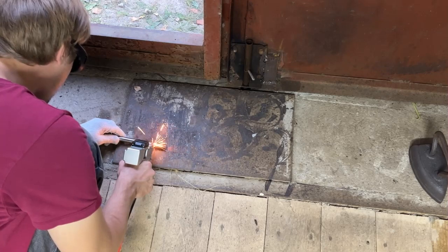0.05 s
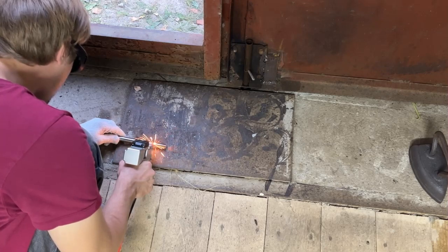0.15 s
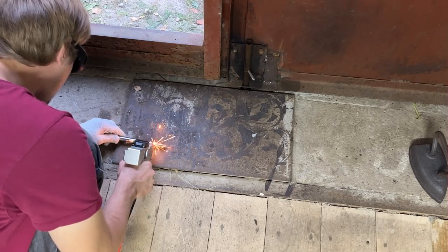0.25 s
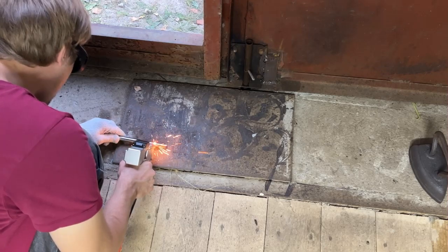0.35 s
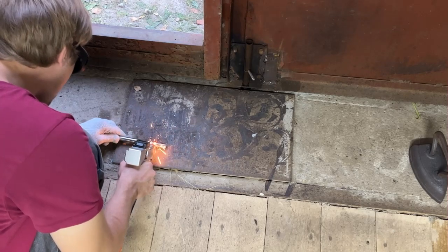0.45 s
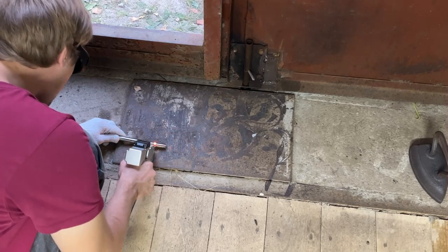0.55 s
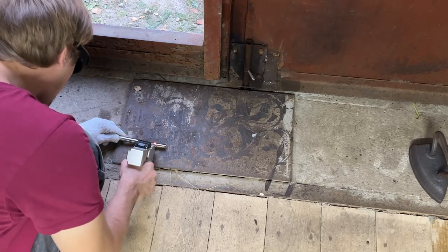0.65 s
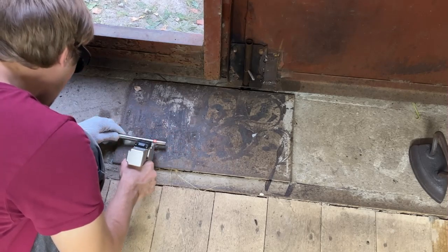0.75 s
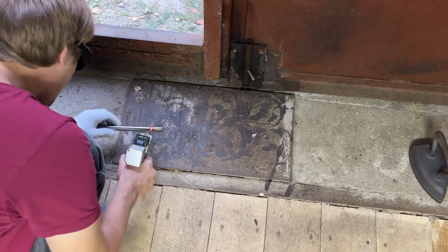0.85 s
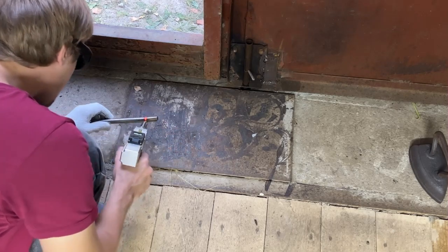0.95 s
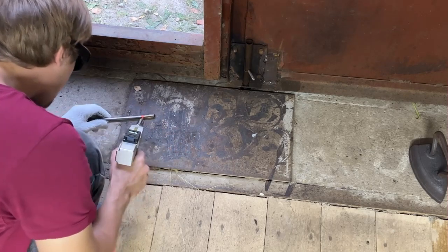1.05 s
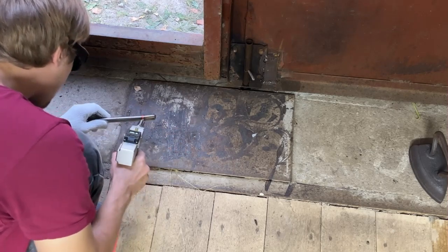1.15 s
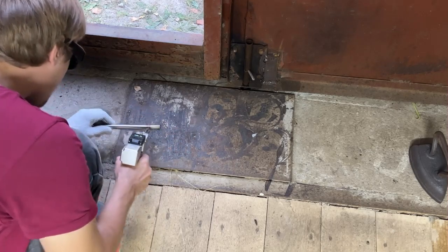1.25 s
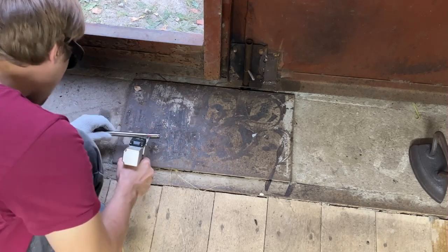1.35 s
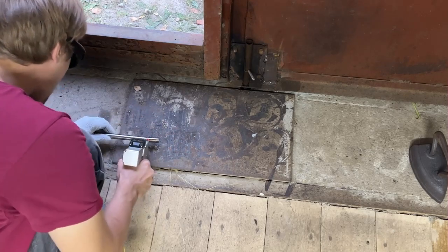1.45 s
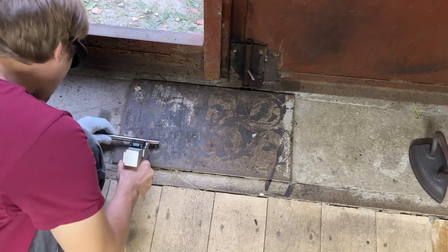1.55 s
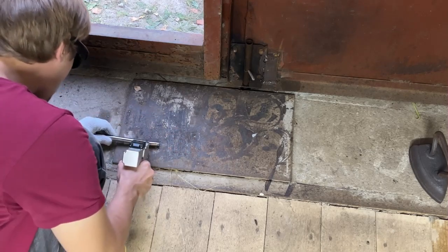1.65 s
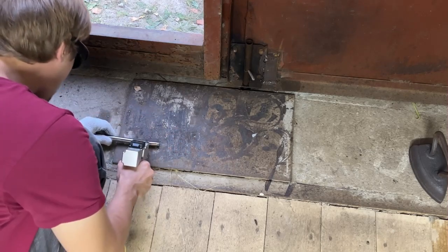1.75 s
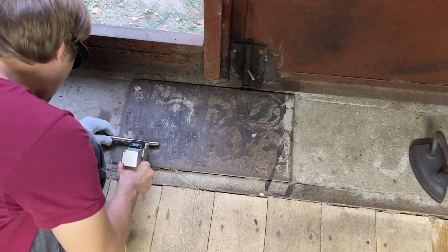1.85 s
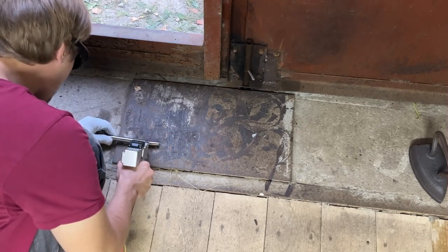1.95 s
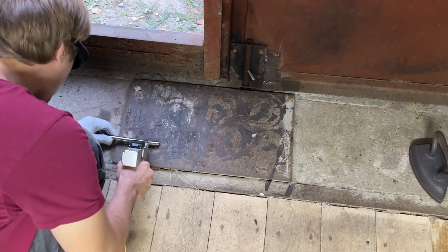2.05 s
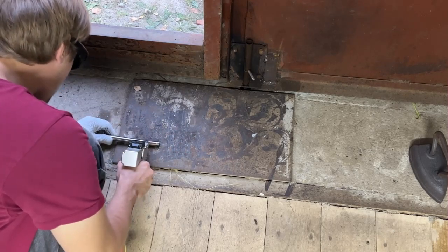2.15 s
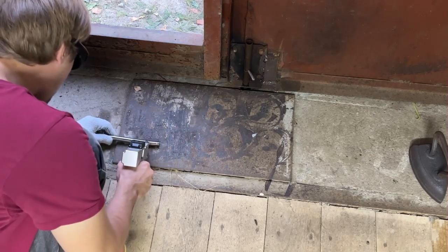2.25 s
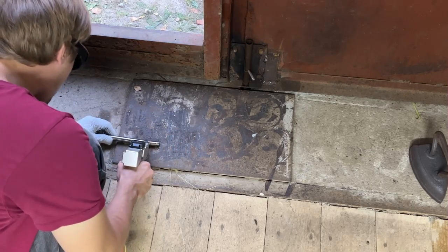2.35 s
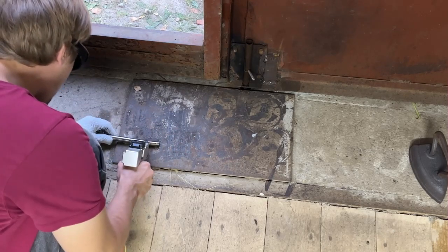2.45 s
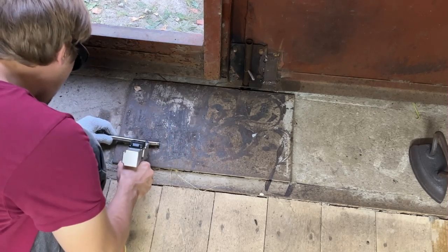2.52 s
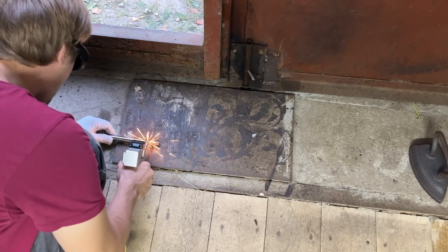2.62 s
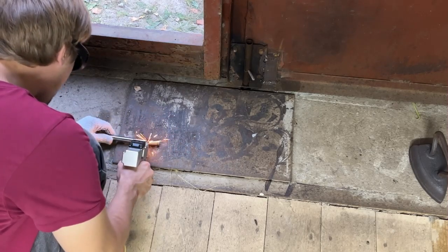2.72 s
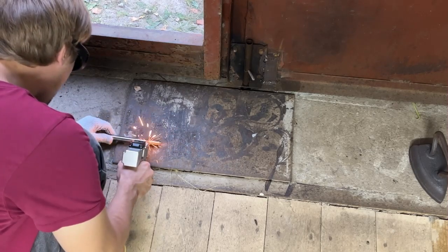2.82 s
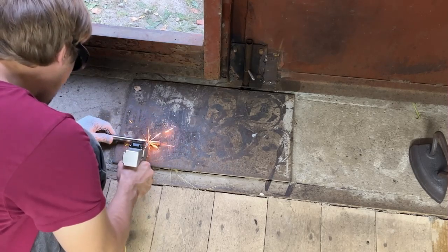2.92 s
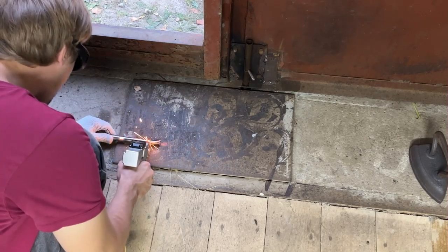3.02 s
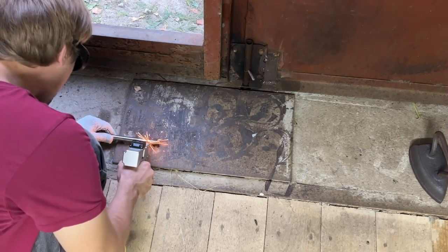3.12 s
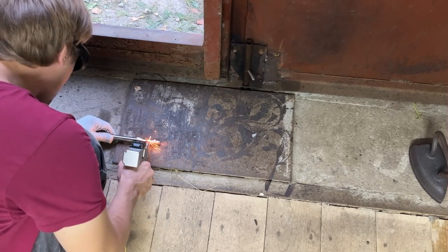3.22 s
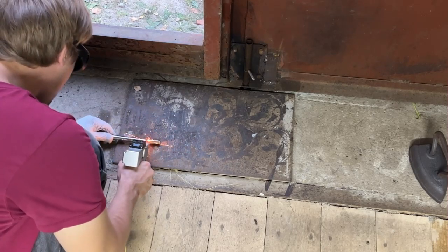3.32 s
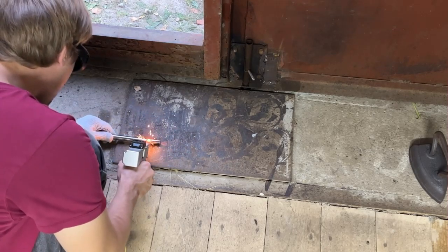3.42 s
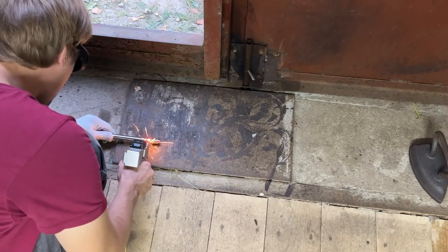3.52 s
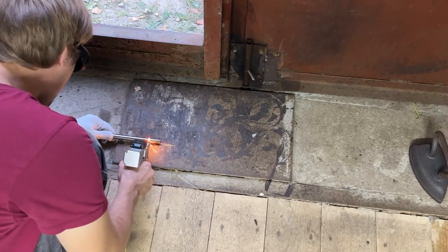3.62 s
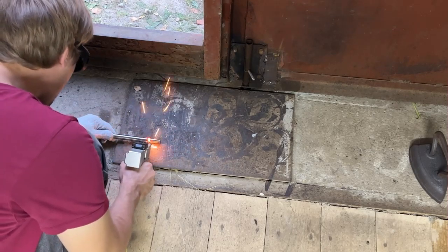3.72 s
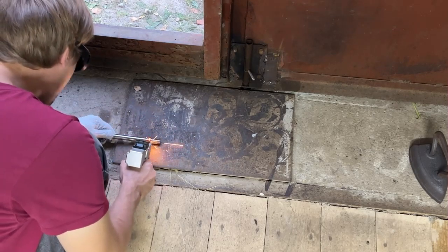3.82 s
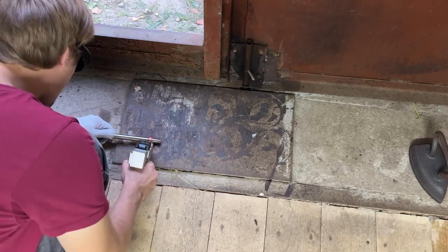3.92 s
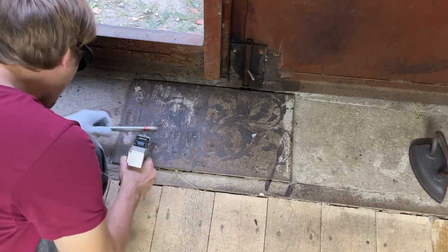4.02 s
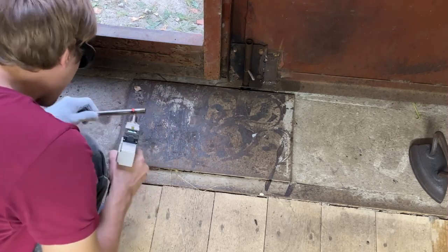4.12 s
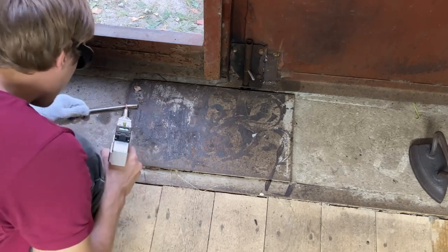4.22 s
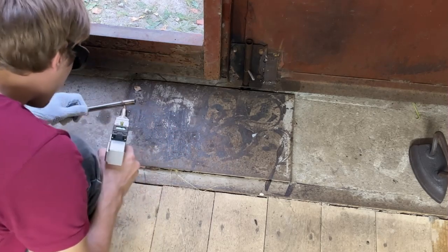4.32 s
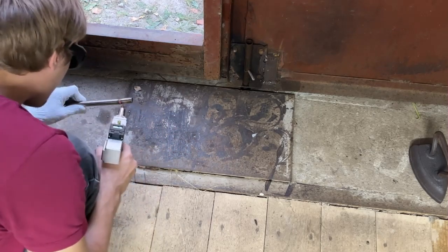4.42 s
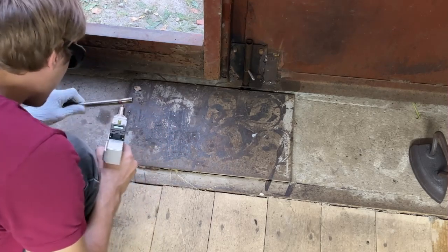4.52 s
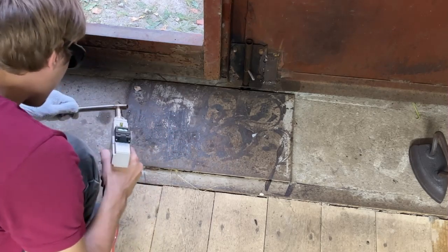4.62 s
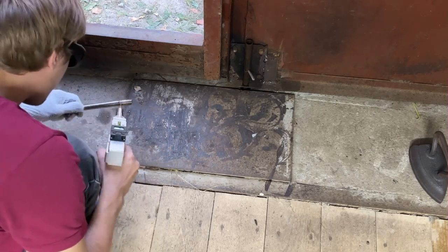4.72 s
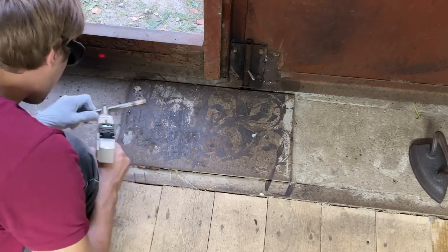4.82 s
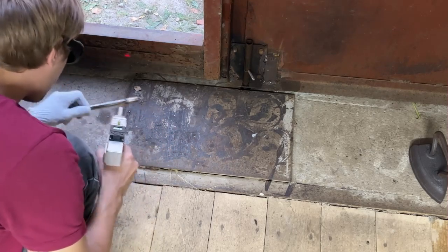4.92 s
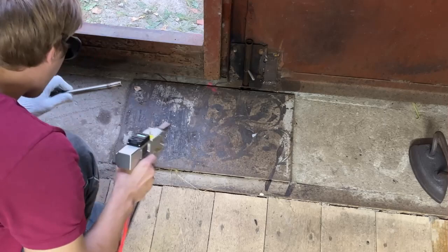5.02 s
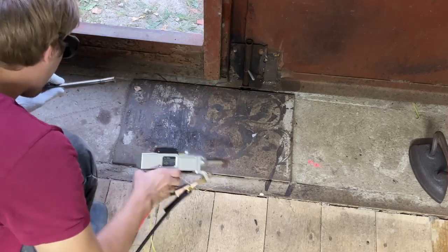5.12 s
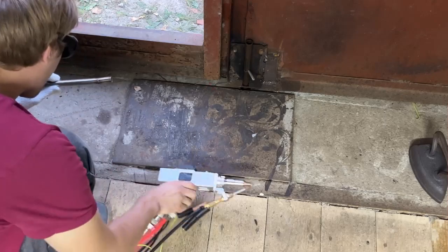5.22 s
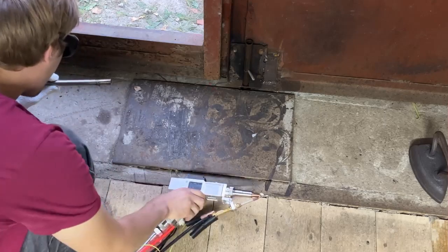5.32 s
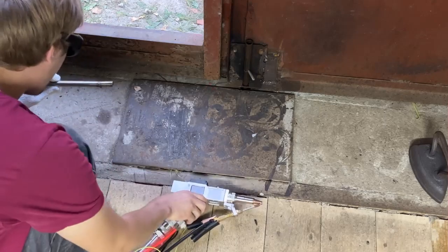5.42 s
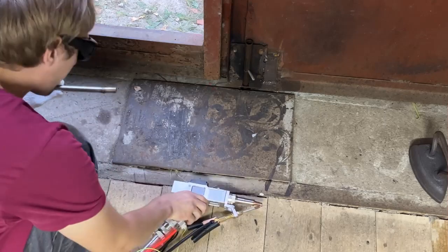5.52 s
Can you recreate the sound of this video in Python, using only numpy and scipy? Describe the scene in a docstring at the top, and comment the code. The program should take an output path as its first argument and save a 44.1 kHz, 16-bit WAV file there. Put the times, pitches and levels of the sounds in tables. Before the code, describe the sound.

A machine's fan hiss and low, wavering hum run throughout in a workshop. From the start, a handheld laser welder sizzles on steel, high and crackling, until about 0.5 seconds. Its shielding gas hisses with a thin, hoarse whistle and fades near 0.9 seconds. At 2 seconds the gas spits and puffs briefly, then spits again at 2.3 and keeps hissing. A second, longer weld sizzles and spatters unevenly from 2.6 to 3.9 seconds, and the gas dies away just after 4.2. After each weld, the wire feeder's motor gives two faint, short blips. At about 4.7 seconds the fan noise steps up a little, and at 4.8 the wire tip flicks off the steel with a small, bright ring. Hoses then bump softly and dully on floorboards around 4.9, 5.3 and 5.4 seconds.

```python
"""Workshop floor, by a door: a handheld laser welder runs two short seams on stainless steel.
Under the beam, vapour pops in the melt pool merge into a sizzle. Shielding gas spits as its valve opens,
hisses and rings the nozzle. The wire feeder's stepper jogs twice after each seam.
A machine drones and hisses behind; its fan noise steps up near the end,
where the wire tip flicks off the steel and the hoses bump the boards."""
import sys
import numpy as np
from scipy import signal
from scipy.fft import rfft, irfft
from scipy.io import wavfile
from scipy.ndimage import map_coordinates

SR = 44100
rng = np.random.default_rng(int(sys.argv[2]) if len(sys.argv) > 2 else 0)


def int16_out(signal):
    """Quantize to a 16-bit WAV file."""
    q = np.round(np.clip(np.atleast_2d(signal).T, -1, 1) * 32767)
    wavfile.write(sys.argv[1], SR, q.astype(np.int16))


N = 245195
TIME_S = np.arange(N) / SR
FREQS_HZ = np.arange(N // 2 + 1) * SR / N

# beam on: start_s, end_s
SEAMS = [(0, .49), (2.59, 3.868)]
# melt pool boil per seam: time_s, sizzle_gain_db, brightness (0-1), spatter_gain_db
FIRST_BOIL = [(0.0, -18.5, 0.63, 2), (0.254, -19.5, 0.7, 4.5), (0.372, -19.5, 0.6, 0.5),
              (0.485, -21.5, 0.28, 4.5)]
SECOND_BOIL = [(2.595, -22, 0.75, 5.5), (2.675, -21, 0.82, 4), (2.72, -23, 0.88, -4), (2.8, -20.5, 1, -1.5),
               (2.9, -23, 0.54, 1.5), (3.163, -23, 0.51, -4), (3.19, -19.5, 1, 2), (3.27, -19.5, 0.94, 3),
               (3.369, -24.5, 0.75, 0), (3.613, -20, 0.8, 3), (3.683, -23.5, 0.76, -9),
               (3.705, -33.5, .6, 4.5), (3.735, -26, 0.55, 5), (3.77, -29, 0.66, 1),
               (3.805, -22, 0.58, 3.5), (3.865, -25, 0.31, 7.5)]
# sizzle peaks and dips per seam: freq_hz, width_hz, gain_db
FIRST_PEAKS = [(9050, 300, -3), (9750, 300, 2), (11360, 200, 5), (11600, 200, -2), (12100, 250, 3),
               (12650, 350, -3), (13300, 500, 2.5), (14000, 250, -4), (14600, 600, 5)]
SECOND_PEAKS = [(8350, 500, 3), (9500, 1200, 1.5), (10650, 220, 4), (11500, 400, 2), (12250, 180, 5.5),
                (12650, 300, -5), (13800, 400, 2), (14200, 300, -3), (15150, 400, -2), (15520, 200, 3)]
# melt pool spectra: freq_hz, gain_db
SIZZLE_SPECTRUM = [(3000, -36), (5500, -18.5), (6700, -15), (8000, -12), (9500, -7), (11000, -5),
                   (12300, -1.5), (13600, -.5), (14600, 0.5), (15300, -2.5), (16000, -6)]
SPATTER_SPECTRUM = [(600, -25), (1400, -2), (2700, -2), (3900, 0), (5000, -5), (8000, -9), (15000, -20)]

# gas valve: open_s, shut_s, gain_db
VALVE_OPENINGS = [(-1, .825, -35), (2.012, 2.165, -35), (2.326, 4.2, -35)]
# gas path and nozzle resonances: freq_hz, width_hz, gain_db
NOZZLE_MODES = [(2000, 110, -13), (3360, 35, 0), (3800, 200, -15), (5520, 300, -9.5), (5970, 42, 5.5),
                (7200, 160, -10), (8850, 110, -6.5), (10000, 65, 0), (11500, 110, 3), (12600, 300, -4.5),
                (13870, 160, 4.5), (15150, 170, 0)]
# whistle contour: time_s, gain_db
WHISTLE_CONTOUR = [(0.45, 2.5), (0.62, -0.5), (0.82, 1.5), (2.15, 4), (2.62, 5), (2.95, 1), (3.7, 1.5),
                   (4.2, 0.5)]
# whistle dips in the mid channel: time_s, half_length_s
WHISTLE_DIPS, DIP_DEPTH = [(2.73, .07), (3.28, .035), (4.13, .055)], .85
WHISTLE_HZ, WHISTLE_WIDTH_HZ, WHISTLE_GAIN_DB = 4865, 65, 5
# gas spectra: freq_hz, gain_db
JET_SPECTRUM = [(800, 10), (1500, 5), (2600, 7), (4200, -8), (5300, 12.5), (6700, -20), (8000, -14),
                (10500, -12), (13000, 11), (16000, -10)]
SPIT_SPECTRUM = [(400, -33), (1200, 3.5), (2500, -1), (3800, 1.5), (5500, 2), (7300, 1.5), (8800, 14),
                 (10100, 12), (11000, 19), (12000, 16), (14500, 5), (16000, -6)]

# fan noise spectrum: freq_hz, gain_db
FAN_SPECTRUM = [(20, -8), (48, -2.5), (76, -10.5), (110, -8), (150, 5.5), (230, -4.5), (340, -2.5),
                (430, -7.5), (600, -3.5), (800, -5), (1000, -12), (1500, -15), (3000, -23.5), (6000, -38),
                (9000, -34), (11000, -39.5), (16000, -31)]
# fan noise resonances before the surge: freq_hz, width_hz, level_db
FAN_MODES = [(48, 9.2, -65), (308, 20, -70), (495, 12, -63), (612, 50, -65), (759, 12, -60.5),
             (850, 25, -68), (4400, 200, -72.5), (4850, 600, -70), (5600, 500, -77), (7450, 300, -78.5),
             (9650, 400, -80), (12630, 380, -67)]
# feeder draws back, then nudges forward: delay_after_seam_s, level_db
WIRE_JOGS = [(0, -51), (.375, -50.5)]

# wire tip contacts: peak_s, level_db, rise_s, fall_s
WIRE_CONTACTS = [(4.801, -40, 0.001, 0.006), (4.805, -32, 0.0007, 0.0046), (4.8095, -32, 0.0005, 0.018)]
# contact rasp spectrum: freq_hz, gain_db
RASP_SPECTRUM = [(1200, -16), (2600, -9), (3600, 0.5), (4400, -8), (8500, -6.5), (10000, -6), (12200, 7),
                 (13300, -2), (16000, 0)]
# steel resonances: freq_hz, gain_db, t60_s
STEEL_MODES = [(3560, -7, .06), (3760, -6, .12), (6880, -2, .07), (9800, -2, .07), (11270, -2, .09),
               (11540, -3, .11), (12460, 1, .12)]
# hoses on boards: peak_s, level_db, rise_s, fall_s
HOSE_BUMPS = [(4.885, -42.5, 0.046, 0.091), (5.285, -36, 0.045, 0.015), (5.415, -35, 0.0075, 0.05)]
# bump spectrum: freq_hz, gain_db
BUMP_SPECTRUM = [(40, -37), (100, -16), (165, 23), (230, -12), (500, -6), (1200, -49), (5000, -80)]

# left-right likeness: freq_hz, correlation
TORCH_STEREO = [(700, .8), (2400, .3), (3500, .2), (3950, -.75), (4500, .15), (4870, .4), (5400, .1),
                (6200, .15), (7050, -.7), (8300, .15), (10000, -.15), (11500, .15), (15000, .35)]
ROOM_STEREO = [(60, 0.84), (700, 0.91), (1300, 0.67), (2400, 0.25), (5000, 0.072), (8000, -0.38),
               (12500, 0.9)]
FLICK_STEREO = [(3700, 0.3), (12000, 0.3)]


def from_db(db):
    """Decibels to gain."""
    return 10 ** (np.asarray(db) / 20)


def unit_rms(x):
    """Scale to rms 1."""
    return x / np.sqrt(np.mean(x ** 2) + 1e-20)


def per_bin(table):
    """Table interpolated to FFT bins, log-frequency axis."""
    freq_hz, value = np.transpose(table)
    return np.interp(np.log(FREQS_HZ + 1), np.log(freq_hz), value)


def coloured(x, spectrum, extra_db=0):
    """Filter by a spectrum; rms 1."""
    return unit_rms(irfft(rfft(x) * from_db(per_bin(spectrum) + extra_db), N))


def stereo(mid_side, correlation):
    """Unrelated mid and side to left and right, correlated by frequency."""
    alike = np.clip(per_bin(correlation), -1, 1)
    mid, side = rfft(mid_side)
    return irfft(np.sqrt(1 + alike) * mid + np.sqrt(1 - alike) * side * [[1], [-1]], N)


def white_pair():
    """Two independent white noises."""
    return rng.standard_normal((2, N))


def wander(rate_hz):
    """Unit Gaussian values joined by ramps."""
    return np.interp(TIME_S * rate_hz, np.arange(N), rng.standard_normal(N))


def flutter(rate_hz, depth_db):
    """Randomly wandering gain."""
    return from_db(depth_db * wander(rate_hz))


def envelope(start_s, end_s, rise_s, fall_s):
    """Gaussian rise, hold from start to end, exponential fall."""
    before_s, after_s = np.minimum(TIME_S - start_s, 0), np.maximum(TIME_S - end_s, 0)
    return np.exp(-(before_s / rise_s) ** 2 - after_s / fall_s)


def bursts(events):
    """Summed envelopes of short events, no hold."""
    return sum(from_db(level_db) * envelope(peak_s, peak_s, rise_s, fall_s)
               for peak_s, level_db, rise_s, fall_s in events)


def resonate(x, freq_hz, width_hz):
    """Two-pole band-pass, peak gain 1."""
    radius, angle = np.exp(-np.pi * width_hz / SR), 2 * np.pi * freq_hz / SR
    feedforward = np.array([1, 0, -1]) * (1 - radius ** 2) / 2
    return signal.lfilter(feedforward, [1, -2 * radius * np.cos(angle), radius ** 2], x)


def vapour_pops(rate_hz, size_db):
    """The keyhole in the melt collapses at random, in millisecond clusters."""
    popped = rng.random(N) < rate_hz / SR
    sizes = from_db(size_db * np.minimum(rng.exponential(1, N), 3)) * rng.choice([-1, 1], N)
    return popped * sizes * flutter(rate_hz=1200, depth_db=1.5)


def melt_pool(seam, boil, peaks, sizzle_gain_db=-1.15, spatter_db=-52.5):
    """Under the beam, dense pops sizzle with shifting brightness; sparser ones spatter lower down."""
    fine = vapour_pops(rate_hz=16000, size_db=3.5)
    coarse = vapour_pops(rate_hz=6000, size_db=3)
    time_s, *columns = np.transpose(boil)
    boil_db, brightness, spatter_gain_db = (np.interp(TIME_S, time_s, column) for column in columns)
    brightness = np.clip(brightness + .16 * wander(rate_hz=30), 0, 1)
    peaks_db = sum(gain_db * np.exp(-(2 * (FREQS_HZ - freq_hz) / width_hz) ** 2)
                   for freq_hz, width_hz, gain_db in peaks)
    tilt_db = 8 * np.log2(np.maximum(FREQS_HZ / 8000, 1))  # 8 dB/octave above 8 kHz
    dull = coloured(fine, SIZZLE_SPECTRUM, peaks_db - tilt_db)
    bright = coloured(fine, SIZZLE_SPECTRUM, peaks_db + tilt_db)
    sizzle = from_db(sizzle_gain_db + boil_db) * ((1 - brightness) * dull + brightness * bright)
    spatter_gain = from_db(spatter_db + spatter_gain_db) * flutter(rate_hz=24.9, depth_db=1.0)
    spatter = spatter_gain * coloured(coarse, SPATTER_SPECTRUM)
    return envelope(*seam, rise_s=0.017, fall_s=0.0092) * (sizzle + spatter)


def reflections(direct, early_db, early_decay_s, tail_db, t60_s, shift_hz):
    """Direct sound, plate and door echoes that shift as the torch moves, short tail; stereo."""
    age_s = TIME_S[:SR // 2]

    def echoes(decay):
        response = rng.standard_normal((2, len(age_s))) * decay
        response /= np.linalg.norm(response, axis=1)[:, None]
        return signal.fftconvolve(direct[None], response, axes=1)[:, :N]

    early_decay = np.exp(-age_s / early_decay_s)
    angle = 2 * np.pi * shift_hz * TIME_S
    early = np.cos(angle) * echoes(early_decay) + np.sin(angle) * echoes(early_decay)
    tail = echoes(from_db(-60 * age_s / t60_s) * (1 - np.exp(-age_s / 0.0057)))
    wet_mid, wet_side = from_db(early_db) * early + from_db(tail_db) * tail
    return np.std(direct) * stereo([unit_rms(direct + wet_mid), unit_rms(wet_side)], TORCH_STEREO)


def gas_flow(open_s, shut_s, rise_s=0.082, sag_db_per_s=0.6, bleed_s=0.073):
    """Flow builds, sags while the valve is open, then bleeds from the hose."""
    elapsed_s = np.clip(TIME_S, open_s, shut_s) - open_s
    build = 1 - np.exp(-(elapsed_s / rise_s) ** 2)
    bleed = np.exp(-np.maximum(TIME_S - shut_s, 0) / bleed_s)
    return from_db(-sag_db_per_s * elapsed_s) * build * bleed


def whistle(turbulence):
    """Main nozzle resonance: hoarse, dipping briefly in the centre; mid and side."""
    mid_gain = np.prod([1 - DIP_DEPTH * np.exp(-((TIME_S - time_s) / half_length_s) ** 4)
                        for time_s, half_length_s in WHISTLE_DIPS], axis=0)
    gain = from_db(WHISTLE_GAIN_DB + np.interp(TIME_S, *np.transpose(WHISTLE_CONTOUR)))
    return gain * resonate(turbulence, WHISTLE_HZ, WHISTLE_WIDTH_HZ) * [mid_gain, np.ones(N)]


def pitch_waver(pair, rate_hz=11, depth=.004):
    """Resonances waver together with the gas, via a varying delay."""
    positions = np.arange(N) - np.cumsum(depth * wander(rate_hz))
    return np.array([map_coordinates(channel, [positions], mode="nearest") for channel in pair])


def shielding_gas(nozzle_gain_db, jet_gain_db, flow_exponent=1.2):
    """Turbulence rings the nozzle; the free jet adds smooth hiss."""
    flow = sum(gas_flow(open_s, shut_s) for open_s, shut_s, _ in VALVE_OPENINGS)
    flow *= flutter(rate_hz=70, depth_db=0.6)
    mode_noise, whistle_noise = white_pair(), white_pair()
    nozzle = flow ** flow_exponent * whistle(whistle_noise)
    for k, (freq_hz, width_hz, gain_db) in enumerate(NOZZLE_MODES):
        exponent = flow_exponent * (freq_hz / WHISTLE_HZ) ** 0.21  # high modes need more flow
        drive = flow ** exponent * flutter(rate_hz=12, depth_db=1.6)
        nozzle += (-1) ** k * drive * from_db(gain_db) * resonate(mode_noise, freq_hz, width_hz)
    jet = flow * from_db(jet_gain_db) * coloured(white_pair(), JET_SPECTRUM)
    open_s, _, valve_db = np.transpose(VALVE_OPENINGS)
    valve_gain = from_db(valve_db[np.searchsorted(open_s, TIME_S) - 1])
    return stereo(valve_gain * (from_db(nozzle_gain_db) * pitch_waver(nozzle) + jet), TORCH_STEREO)


def machine_fan(air_db, surge_s, surge_rise_s, surge_db):
    """Broad fan noise plus resonances; both step up at the surge."""
    air = from_db(air_db) * coloured(stereo(white_pair(), ROOM_STEREO), FAN_SPECTRUM)
    turbulence = stereo(white_pair(), ROOM_STEREO)
    ducts = sum(from_db(level_db) * unit_rms(resonate(turbulence, freq_hz, width_hz))
                for freq_hz, width_hz, level_db in FAN_MODES)
    surge = np.clip((TIME_S - surge_s) / surge_rise_s, 0, 1)
    return from_db(surge_db * surge) * (air + ducts)


def motor_note(pitch_hz, wander_hz):
    """Sine of a motor with wandering speed; rms 1."""
    freq_hz = pitch_hz + wander_hz * wander(rate_hz=20)
    return np.sqrt(2) * np.sin(2 * np.pi * np.cumsum(freq_hz) / SR)


def machine_drone(lower_db, upper_db):
    """Two unsteady motor notes; one swells as the other sinks."""
    balance = flutter(rate_hz=12, depth_db=19)
    lower = from_db(lower_db) * motor_note(pitch_hz=147.2, wander_hz=3.57)
    upper = from_db(upper_db) * motor_note(pitch_hz=175.8, wander_hz=3.71)
    return (balance * lower + upper) * np.sqrt(2 / (1 + balance ** 2))


def wire_feeder(jog_s=0.058, ramp_s=0.0066):
    """The stepper motor sings briefly at each jog."""
    running = sum(from_db(level_db) * envelope(end_s + delay_s, end_s + delay_s + jog_s, ramp_s, ramp_s)
                  for _, end_s in SEAMS for delay_s, level_db in WIRE_JOGS)
    return running * motor_note(pitch_hz=539, wander_hz=0.46)


def gas_spits(delay_s=.012, level_db=-29.5, rise_s=0.014, fall_s=0.022):
    """Pent-up gas escapes as the valve opens."""
    spits = [(open_s + delay_s, level_db, rise_s, fall_s) for open_s, *_ in VALVE_OPENINGS]
    return stereo(bursts(spits) * coloured(white_pair(), SPIT_SPECTRUM), TORCH_STEREO)


def wire_flick(ring_gain_db=-11):
    """The wire tip skips off the steel; each contact rasps and rings the metal."""
    rasp = bursts(WIRE_CONTACTS) * coloured(white_pair(), RASP_SPECTRUM)
    peak_s, level_db, _, _ = np.transpose(WIRE_CONTACTS)
    ring = np.zeros((2, N))
    for freq_hz, gain_db, t60_s in STEEL_MODES:
        signs = rng.choice([-1, 1], (2, len(peak_s)))
        clicks = np.zeros((2, N))
        clicks[:, (peak_s * SR).astype(int)] = from_db(level_db + gain_db) * signs
        radius, angle = from_db(-60 / (t60_s * SR)), 2 * np.pi * freq_hz / SR
        feedback = [1, -2 * radius * np.cos(angle), radius ** 2]
        ring += signal.lfilter([0, np.sin(angle)], feedback, clicks + 1e-18)
    return stereo(rasp + from_db(ring_gain_db) * ring, FLICK_STEREO)


def hose_bumps():
    """The hose bundle thuds dully on the boards."""
    return bursts(HOSE_BUMPS) * coloured(stereo(white_pair(), ROOM_STEREO), BUMP_SPECTRUM)


def scene():
    """Stereo mix: torch, wire, machine, hoses."""
    welds = melt_pool(SEAMS[0], FIRST_BOIL, FIRST_PEAKS) + melt_pool(SEAMS[1], SECOND_BOIL, SECOND_PEAKS)
    welds = reflections(welds, early_db=4.0, early_decay_s=0.0067,
                        tail_db=-5.5, t60_s=0.12, shift_hz=0.698)
    gas = shielding_gas(nozzle_gain_db=7.5, jet_gain_db=-19.0) + gas_spits()
    wire = wire_flick() + wire_feeder()
    fan = machine_fan(air_db=-46.0, surge_s=4.705, surge_rise_s=0.042, surge_db=5)
    drone = machine_drone(lower_db=-59, upper_db=-52.5)
    return welds + gas + wire + fan + drone + hose_bumps()


def record(dry):
    """Steep elliptic low-pass at 15.8 kHz."""
    return signal.sosfilt(signal.ellip(12, .1, 80, 15800, fs=SR, output="sos"), dry)


dry = scene()
out = record(dry)
int16_out(out)
```